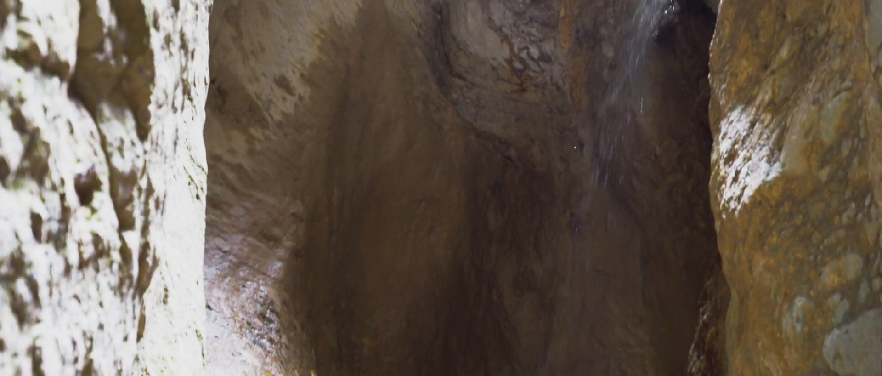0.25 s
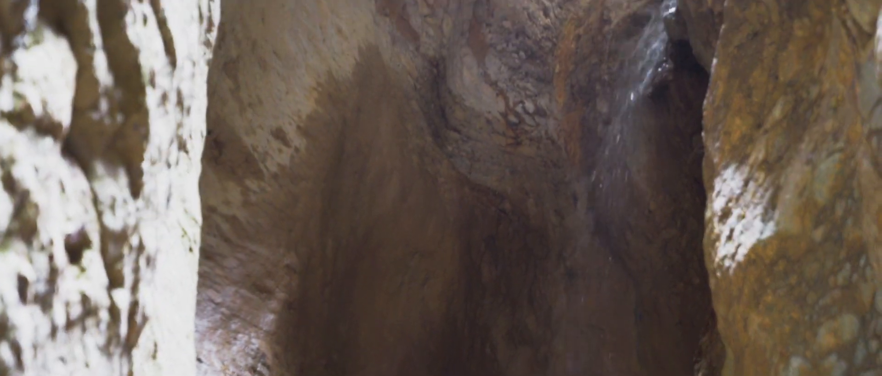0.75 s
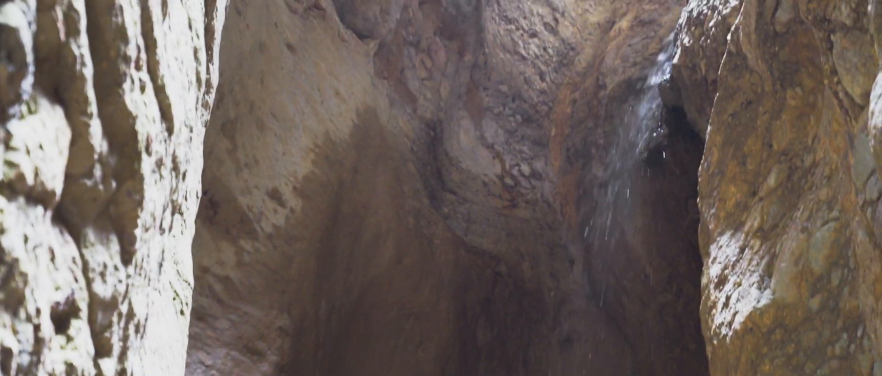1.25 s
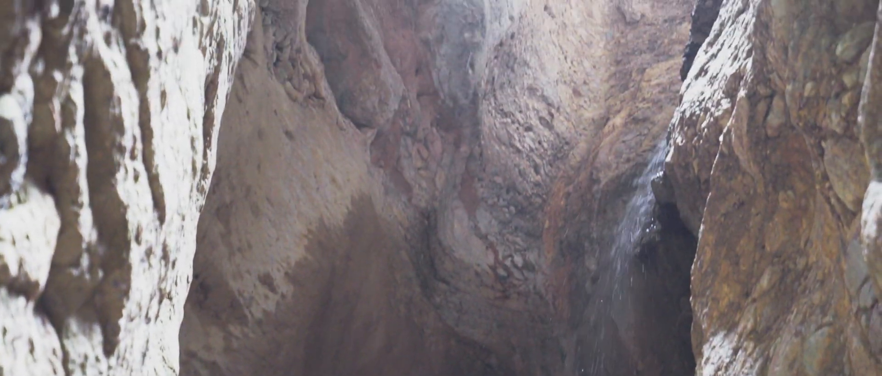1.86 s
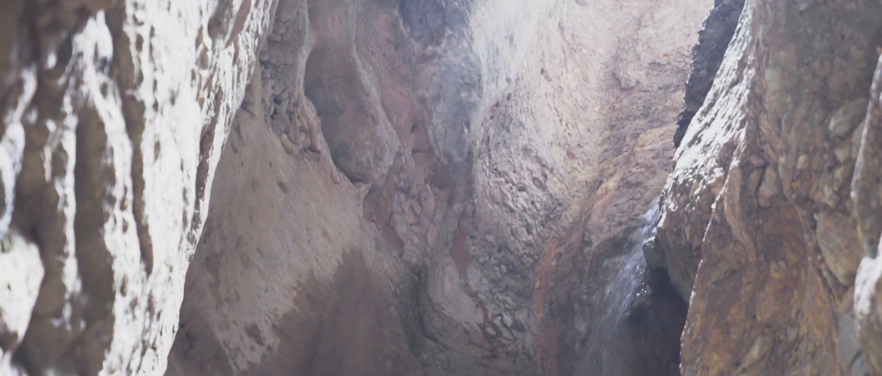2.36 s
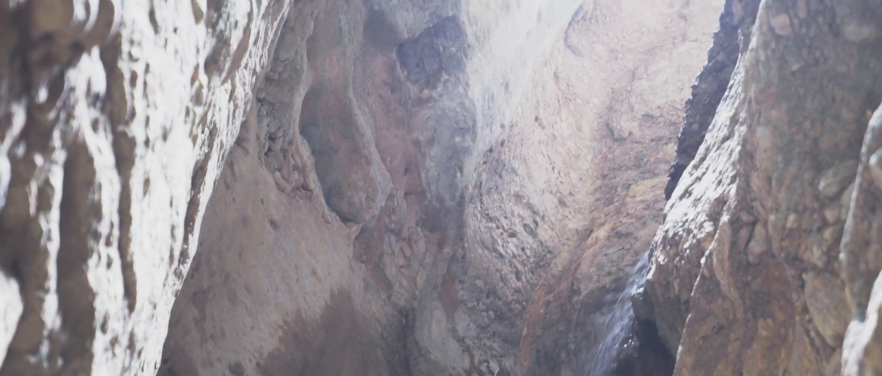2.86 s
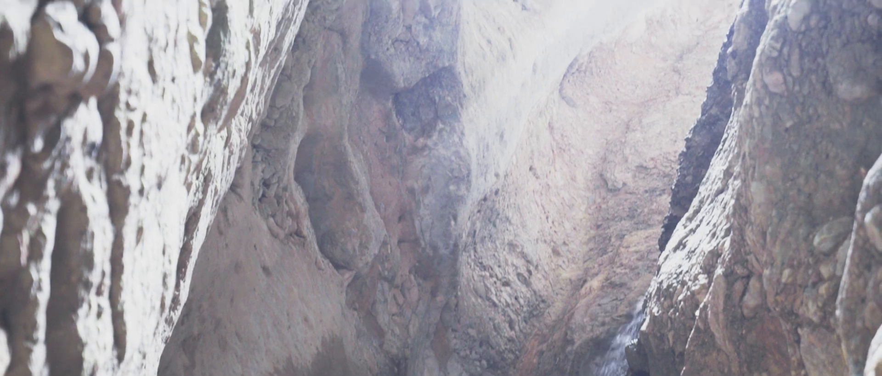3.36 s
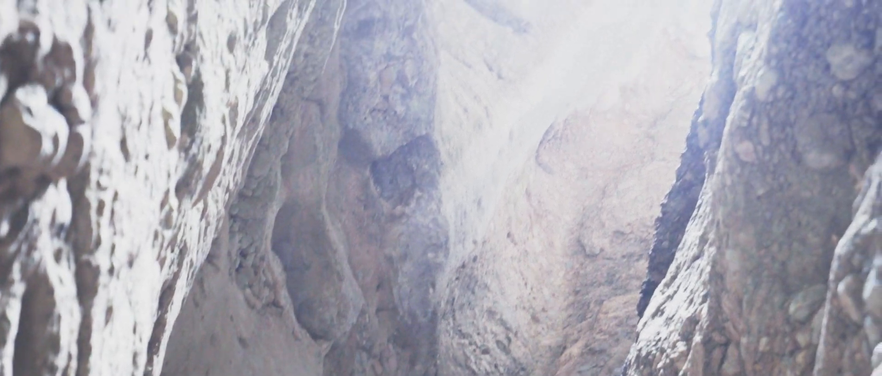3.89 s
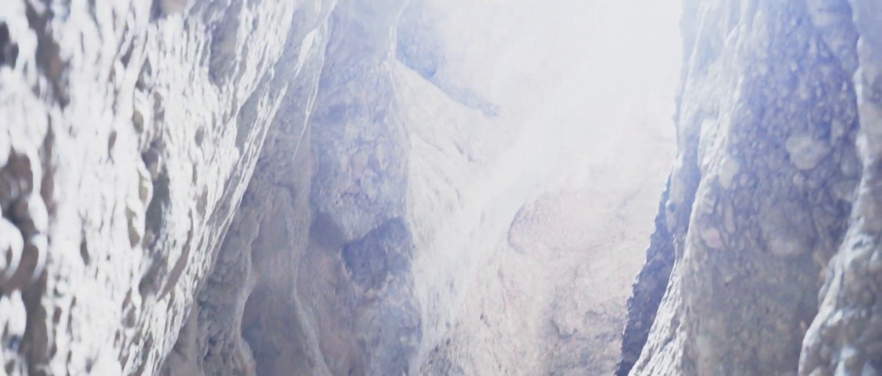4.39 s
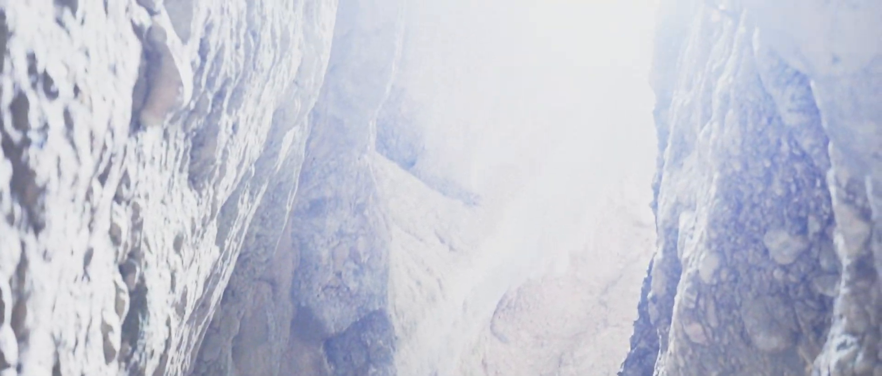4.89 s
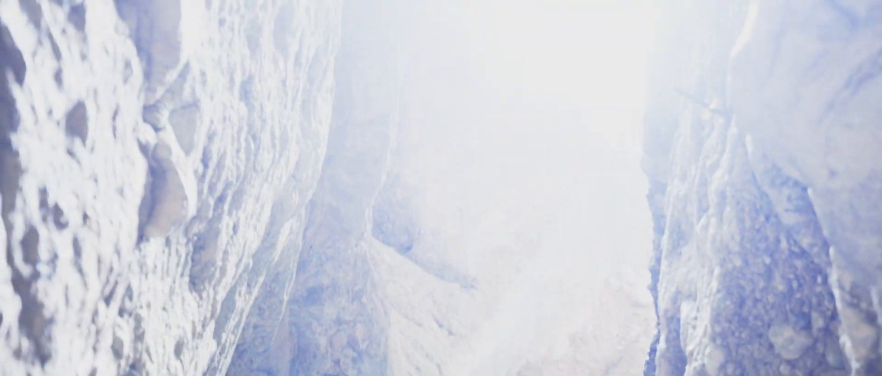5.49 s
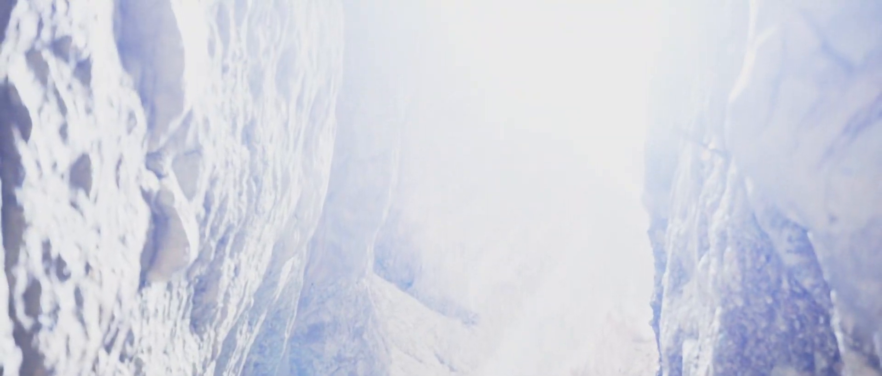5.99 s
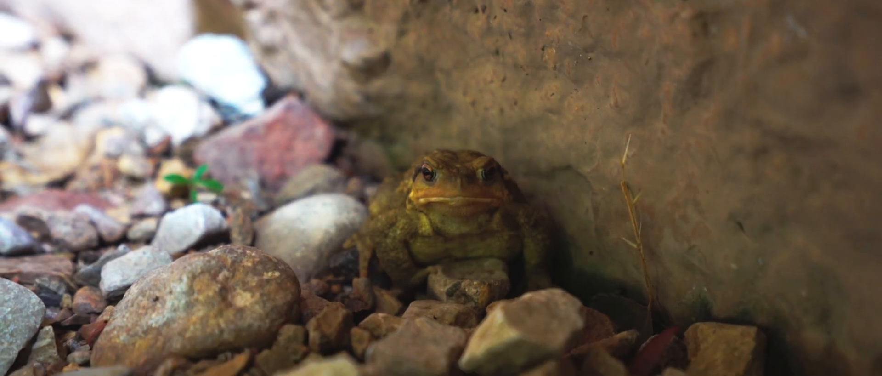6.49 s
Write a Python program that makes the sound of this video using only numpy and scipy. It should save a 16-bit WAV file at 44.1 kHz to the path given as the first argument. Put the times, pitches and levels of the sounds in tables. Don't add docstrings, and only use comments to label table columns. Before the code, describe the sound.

A waterfall roars with bright, dense hissing spray in a narrow rock canyon, then cuts abruptly to much quieter distant rushing water.

```python
import sys
import numpy as np
from scipy import signal
from scipy.fft import rfft, irfft
from scipy.io import wavfile
from scipy.ndimage import uniform_filter1d

SR = 44100
rng = np.random.default_rng(int(sys.argv[2]) if len(sys.argv) > 2 else 0)


def decibels_to_gain(level_db):
    exponent = np.asarray(level_db, float) / 20
    return 10 ** exponent


def waveform_to_disk(signal):
    frames = np.transpose(np.atleast_2d(signal))
    scaled = np.clip(frames, -1, 1) * 32767
    samples = np.round(scaled).astype(np.int16)
    wavfile.write(sys.argv[1], SR, samples)


N = 297216
FRAME, HOP = 512, 128


def evened(x):
    return x / np.sqrt(np.mean(x ** 2) + 1e-20)


def read(points, hz):
    point_hz, value = np.transpose(points)
    return np.interp(np.log(hz + 1), np.log(point_hz + 1), value)


def band(x, lo_hz, hi_hz):
    edges = np.clip([lo_hz, hi_hz], 1, SR / 2.1)
    sos = signal.butter(3, edges, "bandpass", fs=SR, output="sos")
    return signal.sosfilt(sos, x)


def ports(pair, colour_db, same, lean_db, lag):
    shared, separate = rfft(pair)
    same = np.clip(same, -.999, .999)
    left = shared * decibels_to_gain(lean_db / 2)
    mixed = same * shared * np.exp(1j * lag) + np.sqrt(1 - same ** 2) * separate
    right = mixed * decibels_to_gain(-lean_db / 2)
    return irfft(np.array([left, right]) * decibels_to_gain(colour_db), N)


def drops(per_s, spread_db):
    hit = rng.random((2, N)) < per_s / SR
    size = decibels_to_gain(spread_db * np.minimum(rng.exponential(1, (2, N)), 5))
    return evened(hit * size * rng.choice([-1., 1.], (2, N)))


def linger():
    return decibels_to_gain(-78) * evened(band(rng.standard_normal((2, N)), 1300, 6000))


# (frequency [Hz], density [dB per Hz])
FAR_COLOUR = [(15, -49), (25, -19), (102, -14), (140, 0), (391, -4), (635, 1), (926, -3), (1030, 0.5),
              (1870, -3.5), (2140, -1.5), (3200, -4), (14500, -19), (15700, -23)]
# (frequency [Hz], left-right likeness [0 to 1])
FAR_LIKENESS = [(60, 1), (180, 1), (550, 0.68), (1650, 0.4), (4970, 0.26), (15000, 0.25)]


def distant_water():
    hz = np.fft.rfftfreq(N, 1 / SR)
    stream = rng.standard_normal((2, N)) + 0.48 * drops(per_s=2500, spread_db=2.5)
    heard = ports(stream, read(FAR_COLOUR, hz), read(FAR_LIKENESS, hz), 0 * hz, lag=0)
    return decibels_to_gain(-62) * heard / np.sqrt(np.mean(heard.mean(0) ** 2))


def canyon(x):
    roar_db = 4.5
    return evened(x + decibels_to_gain(roar_db) * rng.standard_normal(x.shape))


# (time [s], level [dB])
SWELL = [(0, 0), (.6, .9), (.9, 0), (1.12, -2.5), (1.35, -0.8), (1.7, .5), (2.0, -.5), (2.25, 0.8),
         (2.62, -2), (2.9, 0.5), (3.3, 0), (3.65, -0.7), (4.2, 0.4), (4.55, -.5), (4.75, 0.1), (5.55, -.8),
         (6.16, 1)]
# (time [s], level [dB], half length [s])
WATER_SHEETS = [(0.14, -1.8, 0.02), (0.25, -2, 0.02), (0.42, -2, 0.02), (0.66, -2.7, 0.02),
                (1.14, 0.5, 0.02), (1.31, 2, 0.03), (1.63, 0.4, 0.045), (1.98, -1.6, 0.03),
                (2.19, 0.5, 0.07), (2.32, -1.5, 0.02), (2.37, 0.5, 0.02), (2.47, 1.1, 0.02),
                (2.55, -0.8, 0.02), (2.79, 1.2, 0.07), (3.26, -1.1, 0.03), (3.45, 0.6, 0.03),
                (3.56, -1.0, 0.03), (3.71, -1.5, 0.03), (3.96, 1, 0.02), (4.28, 0.7, 0.07),
                (4.42, -2.1, 0.02), (4.65, -1.0, 0.03), (4.78, 0.6, 0.03), (4.91, 0.8, 0.02),
                (5.06, -0.7, 0.045), (5.19, 1.5, 0.03), (5.3, -1, 0.02), (5.67, 1.2, 0.03),
                (5.79, -0.8, 0.02), (6.01, -2.3, 0.02)]


def surges(t):
    swell = np.interp(t, *np.transpose(SWELL))
    sheets = sum(db * np.exp(-.5 * ((t - s) / half_s) ** 2) for s, db, half_s in WATER_SHEETS)
    turn = -0.25 * t
    wander_db, wander_s = 0.49, 0.064
    kernel = np.exp(-.5 * (np.arange(-60, 61) * HOP / SR / (wander_s / 2)) ** 2)
    wander = signal.oaconvolve(rng.standard_normal((2, len(t))), kernel[None], "same")
    splash_own, body_own = wander_db * evened(wander)
    spray = .45 * swell + sheets + turn
    splash = .9 * swell + .7 * sheets + .6 * turn + splash_own
    body = 0.4 * swell + .3 * sheets + body_own
    layers = np.array([spray, splash, body])
    return layers - layers.mean(axis=1, keepdims=True)


def churn(x, patchy_db, flicker_db):
    hz, t, z = signal.stft(x, SR, nperseg=FRAME, noverlap=FRAME - HOP)
    patches = rng.standard_normal((len(t), len(hz))).T
    patches = uniform_filter1d(patches, size=9, axis=0)
    patches = evened(uniform_filter1d(patches, size=14, axis=1))
    flicker = evened(uniform_filter1d(rng.standard_normal(len(t)), size=6))
    spray, splash, body = surges(t)
    above_body = 1 / (1 + (1500 / (hz[:, None] + 1)) ** 6)
    above_splash = 1 / (1 + (4000 / (hz[:, None] + 1)) ** 6)
    surge_db = above_splash * spray + (above_body - above_splash) * splash + (1 - above_body) * body
    z = z * decibels_to_gain(surge_db + patchy_db * patches + flicker_db * above_splash * flicker)
    return signal.istft(z, SR, nperseg=FRAME, noverlap=FRAME - HOP)[1][:, :N]


def ring(pitch_hz, cycles):
    samples = round(2 * cycles / pitch_hz * SR)
    u = np.arange(samples) / SR * pitch_hz / cycles
    sound = u * np.exp(-3 * u) * np.sin(2 * np.pi * cycles * (u + 0.073 * u ** 2))
    return sound / np.linalg.norm(sound)


# (pitch [Hz], rate [per s], level against the fall [dB])
SWARM = [(547.3, 60, -23.5), (888, 80, -24), (1400, 100, -24), (1999, 120, -22.5), (3020, 150, -23),
         (4500, 150, -21)]
# (time [s], pitch [Hz], ring length [cycles], level against the fall [dB])
LARGE_BUBBLES = [
    (3.574, 1690, 36, -17),
    (4.691, 1446, 18, -17),
    (4.819, 1620, 22, -26.5),
]


def bubbles():
    out = np.zeros((2, N))
    for hz, per_s, db in SWARM:
        for _ in range(5):
            one = ring(hz * rng.uniform(.8, 1.25), rng.uniform(5.3, 18))
            born = rng.random((2, N)) < per_s / 5 / SR
            births = born * rng.uniform(0.23, 1, (2, N))
            out += decibels_to_gain(db + 31.5) * signal.oaconvolve(births, one[None], axes=1)[:, :N]
    for s, hz, cycles, db in LARGE_BUBBLES:
        one = ring(hz, cycles)
        out[:, round(s * SR):][:, :len(one)] += decibels_to_gain(db + 33) * one
    return out


# (frequency [Hz], density [dB per Hz])
FALL_COLOUR = [(15, -81.5), (25, -49.5), (152, -24), (194, -18), (390, -10), (510, -5), (724, -7.5),
               (1030, -1.5), (1140, -2.5), (1500, 1), (3640, 1.5), (7340, 2.5), (11900, 1.5), (14400, -1.5),
               (15600, -3.5)]
# (frequency [Hz], width [Hz], level [dB])
WALL_MODES = [(118, 28, 3), (195, 33, 3.5), (581, 46, 3), (760, 110, 1), (955, 220, 2), (2200, 800, -1),
              (2550, 200, 0), (6300, 2500, 0.5)]
# (frequency [Hz], left-right likeness [-1 to 1])
FALL_LIKENESS = [(30, .8), (60, .975), (95, .998), (180, .998), (400, .98), (580, .96), (770, .72),
                 (1030, .85), (1500, .56), (1800, .2), (2400, .22), (3500, -.08), (4500, .03), (5500, .3),
                 (15000, .27)]
# (frequency [Hz], left minus right [dB])
PORT_LEAN = [(300, -0.5), (700, -1), (1100, -0.3), (1700, 0.4), (2400, -2.5), (3300, 0), (5000, -1),
             (8500, -3.5), (11500, -2), (15000, 0)]


def waterfall():
    spray = canyon(drops(per_s=8000, spread_db=2.0))
    water = churn(spray + bubbles(), patchy_db=.5, flicker_db=0.7)
    hz = np.fft.rfftfreq(N, 1 / SR)
    modes_db = sum(db / (1 + (2 * (hz - f) / width) ** 2) for f, width, db in WALL_MODES)
    colour_db = read(FALL_COLOUR, hz) + modes_db
    lag = -.3 * (hz > 4500)
    heard = ports(water, colour_db, read(FALL_LIKENESS, hz), read(PORT_LEAN, hz), lag)
    spray_rms = np.sqrt(np.mean(band(heard.mean(0), 3910, 18500) ** 2))
    return heard / spray_rms * decibels_to_gain(-21.46)


def scene():
    cut_s, resume_s = 6.1506, 6.1913
    t = np.arange(N) / SR
    gap = (t >= cut_s) & (t < resume_s)
    return waterfall() * (t < cut_s) + linger() * gap + distant_water() * (t >= resume_s)


def low_pass(x):
    return signal.sosfilt(signal.butter(12, 15740, fs=SR, output="sos"), x)


def record(dry):
    return low_pass(dry)


dry = scene()
out = record(dry)
waveform_to_disk(out)
```